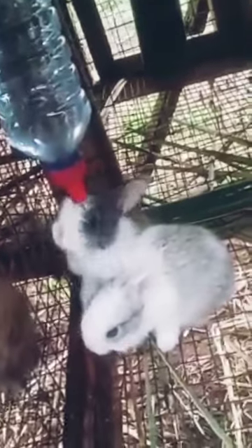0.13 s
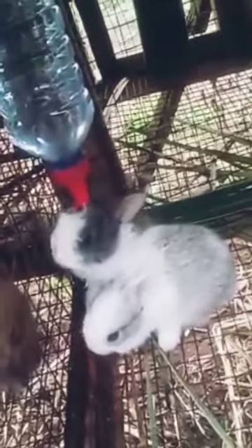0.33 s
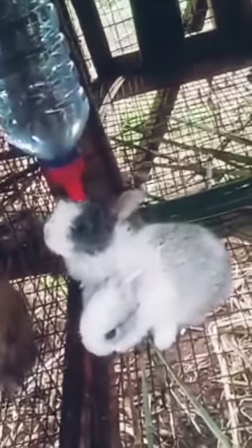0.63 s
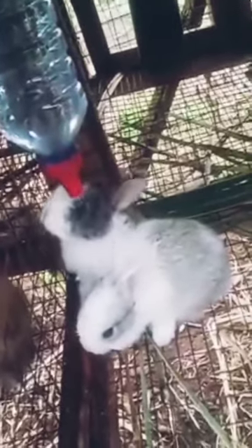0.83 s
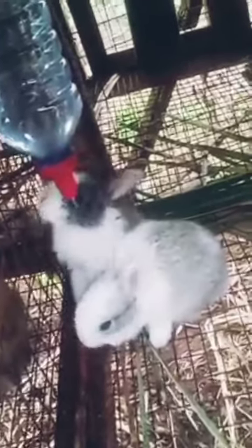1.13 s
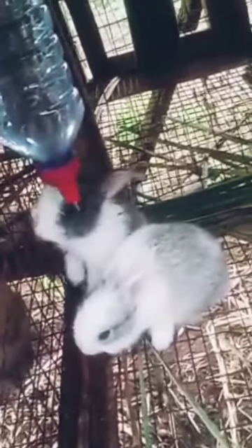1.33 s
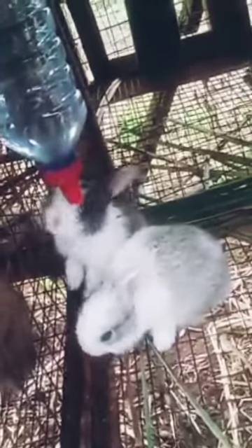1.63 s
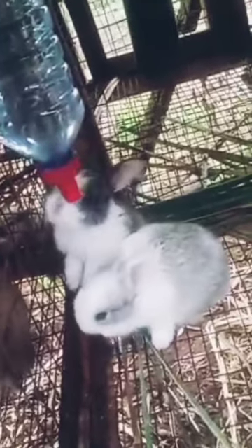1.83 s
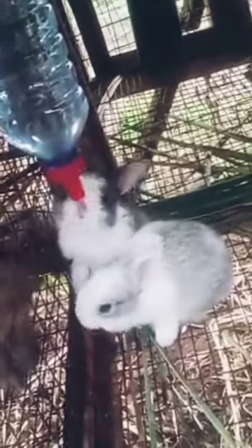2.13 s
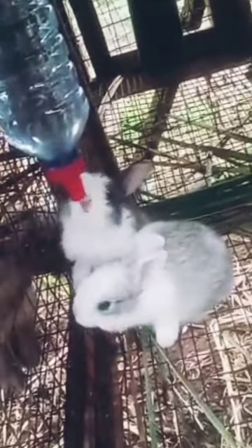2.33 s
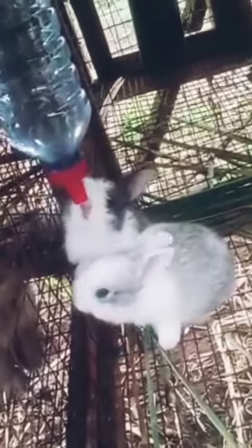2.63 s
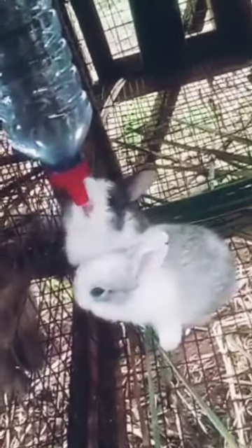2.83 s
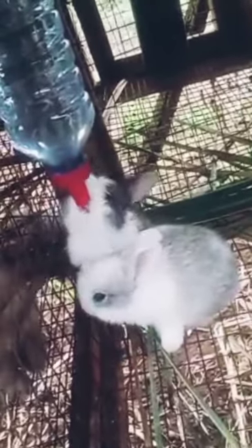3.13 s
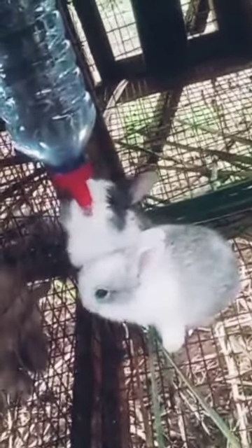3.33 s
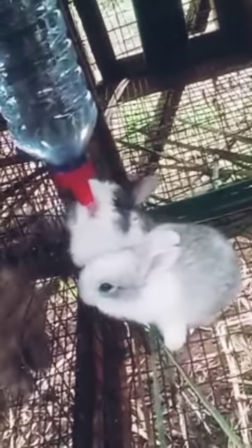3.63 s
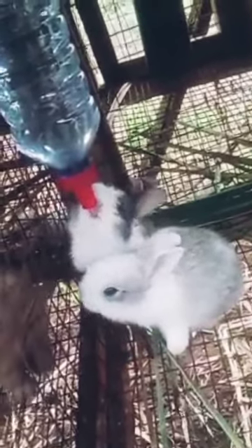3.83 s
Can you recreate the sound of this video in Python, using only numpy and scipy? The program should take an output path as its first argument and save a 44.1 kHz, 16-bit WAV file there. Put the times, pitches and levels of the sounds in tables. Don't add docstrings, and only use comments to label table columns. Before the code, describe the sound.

Close up in an outdoor hutch, a drinking-bottle ball rattles sharply in its metal tube under steady licking, with lip pops, tiny bubbles and a few faint wooden taps over very quiet air and low hum.

```python
import sys
import numpy as np
from scipy import signal
from scipy.fft import rfft, irfft
from scipy.io import wavfile
from scipy.ndimage import uniform_filter1d

SR = 44100
rng = np.random.default_rng(int(sys.argv[2]) if len(sys.argv) > 2 else 0)


def output_pcm(signal):
    pcm = np.clip(np.atleast_2d(signal).T, -1, 1) * 32767
    wavfile.write(sys.argv[1], SR, np.round(pcm).astype(np.int16))


def linear_from_db(decibels):
    return 10 ** (np.asarray(decibels, float) / 20)


N = 176400
CLOCK = np.arange(N) / SR


def ring(x, hz, t60):
    pole = np.exp(2j * np.pi * hz / SR - np.log(1000) / (t60 * SR))
    return signal.lfilter([1], [1, -pole], x).imag


def fade(x, t60):
    return signal.lfilter([1], [1, -np.exp(-np.log(1000) / (t60 * SR))], x)


def highpass(x, order, hz):
    return signal.sosfilt(signal.butter(order, hz, "high", fs=SR, output="sos"), x)


def strikes(times, sizes):
    return np.bincount(np.clip((times * SR).astype(int), 0, N - 1), sizes, N)


def unit(x):
    return x / np.sqrt(np.mean(x ** 2))


def walk(rate):
    k = int(SR / rate)
    return unit(uniform_filter1d(uniform_filter1d(rng.standard_normal(N), k), k))


# (frequency [Hz], level [dB per Hz])
YARD_SPECTRUM = [
    (40, -1),
    (105, -7),
    (213, -13.5),
    (680, -18.5),
    (1170, -15),
    (4200, -32),
    (8600, -37),
    (11000, -39),
]


def yard():
    yard_db, flicker_db = -63.5, 3.2
    f = np.maximum(np.fft.rfftfreq(N, 1 / SR), 1)
    hz, db = np.array(YARD_SPECTRUM).T
    shape = linear_from_db(np.interp(np.log(f), np.log(hz), db))
    air = 0
    for octave in np.arange(5, 14.5, .5):
        band = np.maximum(1 - np.abs(np.log2(f) - octave) * 2, 0) ** .5
        noise = irfft(rfft(rng.standard_normal(N)) * shape * band, N)
        air = air + noise * linear_from_db(flicker_db * walk(28))
    return linear_from_db(yard_db) * unit(air)


# (frequency [Hz], level [dB rms])
HUM_TONES = [
    (59.2, -61.5),
    (118.4, -70.5),
    (673, -77),
]


def hum():
    out = 0
    for hz, db in HUM_TONES:
        level = np.sqrt(2) * linear_from_db(db + 1.3 * walk(26.0))
        out = out + level * np.sin(2 * np.pi * hz * (CLOCK + 0.12 / hz * walk(5.9)))
    return out


# (time [s], level [dB], pitch [Hz])
HUTCH_TAPS = [
    (0.333, -54, 330),
    (1.337, -49, 365),
    (3.5105, -44, 1880),
    (3.5175, -40.5, 1880),
    (3.523, -38, 1630),
    (3.608, -52, 274),
]


def taps():
    cycles = 4.8
    out = 0
    for t, db, hz in HUTCH_TAPS:
        rap = fade(strikes(np.array([t]), linear_from_db([db - 14.0])), 20 / hz) * rng.standard_normal(N)
        out = out + ring(rap, hz, cycles / hz) + .5 * ring(rap, 0.75 * hz, cycles / hz / 3)
    return out


# (time [s], peak level [dB], start pitch [Hz])
RISING_BUBBLES = [
    (0.058, -56.5, 1440),
    (0.667, -49, 1270),
    (1.107, -56, 1440),
    (1.127, -48, 1477),
    (1.624, -52, 1470),
    (1.639, -64, 1540),
    (3.508, -51, 1320),
]


def bubbles():
    rise_per_s, peak_s = 3.4, 0.0063
    out, u = np.zeros(N), np.arange(int(8 * peak_s * SR)) / SR
    envelope = np.exp(1 - u / peak_s) * u / peak_s
    for t, db, hz in RISING_BUBBLES:
        tone = np.sin(2 * np.pi * hz * (u + rise_per_s * u ** 2 / 2)) * envelope
        out[int(t * SR):int(t * SR) + len(u)] += linear_from_db(db) * tone
    return out


# (time [s], peak level [dB])
TONGUE_SMACKS = [(0.042, -41.5), (0.2403, -45), (0.662, -44), (0.8477, -38), (1.0718, -39.5), (1.266, -41),
                 (1.478, -42.5), (1.6947, -42.5), (1.9102, -43.5), (2.4667, -44.5), (2.097, -39),
                 (2.8716, -44), (3.0987, -51), (3.2985, -49), (3.305, -55), (3.5338, -44.5), (3.5386, -45),
                 (3.7581, -47.5), (3.7625, -48), (3.9805, -48.5), (3.984, -48.5)]
# (time [s], peak level [dB])
LIP_POPS = [(0.096, -33), (0.3, -51), (0.743, -38), (0.9513, -34), (0.956, -36), (1.1222, -36.5),
            (2.566, -45), (3.1441, -29), (3.2, -47), (3.333, -36), (3.6613, -33.5), (3.8328, -29)]


def tongues():
    smack_hz, pop_hz, level_db, snap_db, peak_s = 2200, 2830, -6, 14, .0005
    out, u = np.zeros(N + 400), np.arange(400) / SR
    events = [(t, db, smack_hz, 1) for t, db in TONGUE_SMACKS]
    events += [(t, db, pop_hz, .1) for t, db in LIP_POPS]
    for t, db, hz, bright in events:
        pitch, top = rng.standard_normal(2)
        body = np.sin(2 * np.pi * hz * 2 ** (.25 * pitch) * u) * np.exp(1 - u / peak_s) * u / peak_s
        snap = bright * linear_from_db(snap_db + top) * rng.standard_normal(400) * np.exp(-u / 0.00048)
        out[int(t * SR):int(t * SR) + 400] += linear_from_db(db + level_db) * (body + snap)
    return highpass(out[:N], 2, 800)


# (peak time [s], level [dB])
WATER_SWELLS = [(0.127, -50), (0.345, -57), (0.607, -49.5), (0.725, -49), (0.806, -49.5), (0.928, -42.5),
                (1.002, -49), (1.097, -51.5), (1.141, -45.5), (1.376, -48), (1.441, -52.5), (1.508, -62),
                (1.583, -47.5), (1.634, -51), (1.783, -47.5), (1.963, -48), (2.152, -48.5), (2.34, -47.5),
                (2.549, -45.5), (2.76, -40.5), (2.907, -53), (2.961, -42.5), (3.37, -45.5), (3.646, -45.5),
                (3.793, -56), (3.873, -53.5)]


def swell():
    width_s = 0.018
    return sum(linear_from_db(db) * np.exp(-((CLOCK - s) / width_s) ** 2) for s, db in WATER_SWELLS)


# (frequency [Hz], level [dB], t60 [s])
BOTTLE_MODES = [
    (1145, 10, 0.046),
    (933.6, -3.5, 0.094),
    (1500, -9.5, 0.076),
    (561, -0.5, 0.034),
    (284, -16.5, 0.019),
]


def air_column(hits):
    flow = swell()
    breath = linear_from_db(-35.5) * flow + linear_from_db(-60.5) * fade(hits, 0.018)
    phase = np.cumsum(BOTTLE_MODES[0][0] * (1 + 0.0145 * walk(28.5))) / SR
    out = linear_from_db(-8.0) * flow * np.sin(2 * np.pi * phase)
    for hz, db, t60 in BOTTLE_MODES:
        out = out + linear_from_db(db) * ring(breath * rng.standard_normal(N), hz, t60)
    return out


# (peak time [s], level [dB])
BALL_SCRAPES = [(0.19, -56), (0.317, -44), (.39, -52), (0.532, -40), (.594, -61), (.719, -57), (.795, -43),
                (0.929, -38.5), (0.993, -45), (1.127, -38.5), (1.193, -60), (1.338, -51), (1.376, -49),
                (1.43, -68), (1.57, -63), (1.635, -67), (1.71, -50), (1.764, -46), (1.92, -42.5),
                (1.956, -35.5), (2.105, -44), (2.125, -41), (2.149, -56), (2.278, -49.5), (2.335, -36),
                (2.531, -56), (2.542, -39), (2.739, -32), (2.937, -38), (2.955, -38.5), (2.968, -43),
                (3.015, -65), (3.117, -50.5), (3.164, -41.5), (3.318, -58), (3.365, -41), (3.378, -39),
                (3.401, -46), (3.573, -53), (3.621, -37.5), (3.649, -47), (3.827, -46), (3.854, -57),
                (3.869, -74), (3.998, -49)]


def scrapes():
    rise_s, fall_s = 0.0089, 0.012
    power = 0
    for s, db in BALL_SCRAPES:
        width = np.where(CLOCK < s, rise_s, fall_s)
        power = power + linear_from_db(2 * db) * np.exp(-2 * ((CLOCK - s) / width) ** 2)
    return power ** .5


def bounces(drag):
    ticks_per_s, strays_per_s = 340, 35
    when, size = rng.random(N), rng.exponential(size=N)
    ticks = (when < ticks_per_s / SR) * linear_from_db(9.5 - 1.5 * size) * drag
    return ticks + (1 - when < strays_per_s / SR) * linear_from_db(-57 + 2 * size)


def grit_level(t, db, hits, drag):
    grit = linear_from_db(-14.5 + 1.7 * walk(220)) * drag
    grit = grit + linear_from_db(-33.5) * fade(hits, 0.025) + linear_from_db(-54) * fade(hits, .24)
    rested = np.diff(t, prepend=0) > .03
    first = strikes(t, linear_from_db(db) * rested)
    return grit + linear_from_db(-32.5) * fade(first[::-1], 0.025)[::-1]


# (frequency [Hz], level [dB])
TUBE_MODES = [(5850, -37), (6650, -11.5), (7400, -11), (8100, -11), (8650, -1), (9300, -8), (9900, -14.5),
              (11400, -13), (12300, -14.5), (13700, -14), (14700, -24)]


def tube(t, knock_db, ticks, grit):
    ring_cycles = 42
    weight = linear_from_db(np.array(TUBE_MODES)[:, 1])
    mix = linear_from_db(2.5 * rng.standard_normal((len(t), len(TUBE_MODES))))
    mix = mix * np.sqrt(np.sum(weight ** 2) / np.sum((mix * weight) ** 2, axis=1, keepdims=True))
    late = 0.00025 * rng.random(mix.shape)
    out = 0
    for k, (hz, mode_db) in enumerate(TUBE_MODES):
        knocks = strikes(t + late[:, k], (-1) ** k * linear_from_db(knock_db) * mix[:, k])
        rough = grit * linear_from_db(-18 * (hz > 10000) + 3 * walk(110))
        push = knocks + (ticks + rough) * rng.standard_normal(N)
        out = out + linear_from_db(mode_db) * ring(push, hz, ring_cycles / min(hz, 9000))
    return highpass(out, 2, 5000)


# (frequency [Hz], level [dB])
CAVITIES = [
    (1900, -27.5),
    (2800, -24),
    (4200, -22.5),
]


def wet_cavities(t, db, ticks, grit):
    out = 0
    for hz, mode_db in CAVITIES:
        scatter = 4 * np.tanh(rng.standard_normal(len(t)))
        splash = fade(strikes(t, linear_from_db(.5 * db - 35.5 + scatter)), 0.0089)
        push = (splash + ticks + 3 * grit * linear_from_db(3 * walk(85))) * rng.standard_normal(N)
        out = out + linear_from_db(mode_db) * ring(push, hz, 0.0034)
    return out


# (time [s], peak level [dB])
BALL_KNOCKS = [(0.0208, -23), (0.0615, -15), (0.0794, -33), (0.0836, -30), (0.1162, -23), (0.12, -21),
               (0.122, -14), (0.1238, -24), (0.1357, -26), (0.1786, -35), (0.1818, -26), (0.1857, -29),
               (0.2604, -14), (0.2671, -27), (0.2834, -15), (0.2851, -26), (0.3032, -32), (0.3253, -29),
               (0.3354, -15), (0.3373, -14), (0.3849, -31), (0.3938, -35), (0.4037, -33), (0.4184, -25),
               (0.4679, -15), (0.4729, -29), (0.4926, -16), (0.4951, -32), (0.5134, -25), (0.5193, -20),
               (0.5216, -13), (0.5461, -37), (0.5858, -35), (0.5874, -32), (0.5918, -26), (0.5937, -26),
               (0.5967, -28), (0.67, -16), (0.6972, -16), (0.6995, -27), (0.7097, -24), (0.7144, -24),
               (0.7169, -15), (0.7188, -19), (0.7271, -26), (0.7359, -33), (0.7434, -35), (0.7848, -29),
               (0.7898, -28), (0.8022, -24), (0.8813, -16),
               (0.8872, -29), (0.9082, -22), (0.9206, -19), (0.9286, -22), (0.9324, -23), (0.952, -35),
               (0.957, -37), (0.9611, -21), (0.9798, -30), (0.9966, -31), (1.0008, -27), (1.0132, -31),
               (1.021, -32), (1.0698, -25), (1.0893, -19), (1.1097, -25), (1.1284, -21), (1.1348, -11),
               (1.1482, -25), (1.1543, -27), (1.188, -34), (1.1939, -32), (1.1957, -21), (1.2902, -14),
               (1.2975, -28), (1.3095, -12), (1.3126, -25), (1.3337, -27), (1.346, -16), (1.3498, -20),
               (1.3532, -26), (1.3655, -21), (1.3671, -21), (1.3698, -18), (1.4124, -32), (1.4181, -28),
               (1.4297, -31), (1.4354, -25), (1.4807, -37), (1.5024, -14), (1.5044, -26), (1.5079, -28),
               (1.522, -13), (1.5243, -23), (1.5478, -34), (1.5519, -15), (1.5539, -26), (1.5563, -24),
               (1.5582, -25), (1.5729, -28), (1.5767, -24),
               (1.5803, -19), (1.5828, -24), (1.5849, -26), (1.6247, -31), (1.6307, -30), (1.6428, -31),
               (1.6474, -22), (1.7192, -17), (1.7395, -18), (1.7415, -31), (1.7685, -25), (1.775, -15),
               (1.7769, -12), (1.7799, -25), (1.7885, -20), (1.8211, -36), (1.8272, -31), (1.9103, -33),
               (1.9323, -25), (1.95, -30), (1.954, -19), (1.9577, -19), (1.963, -16), (2.135, -28),
               (2.1381, -21), (2.1462, -28), (2.155, -33), (2.2866, -17), (2.3164, -25), (2.3219, -19),
               (2.3283, -22), (2.3361, -22), (2.343, -23), (2.4868, -13), (2.4929, -27), (2.5128, -27),
               (2.5198, -16), (2.5225, -20), (2.5258, -25), (2.5293, -25), (2.5322, -19), (2.5389, -22),
               (2.5407, -16), (2.5901, -28), (2.6898, -14), (2.6971, -24), (2.7136, -37), (2.7224, -16),
               (2.7249, -24), (2.7278, -22), (2.7312, -17),
               (2.7436, -24), (2.7543, -16), (2.7722, -22), (2.8083, -19), (2.9002, -15), (2.9201, -21),
               (2.9468, -19), (2.9549, -17), (2.9706, -28), (3.0115, -31), (3.1282, -20), (3.1457, -25),
               (3.1613, -13), (3.1636, -18), (3.1696, -25), (3.1749, -28), (3.2222, -38), (3.3267, -16),
               (3.3294, -28), (3.3316, -29), (3.3514, -24), (3.3557, -30), (3.3618, -21), (3.3644, -26),
               (3.3811, -27), (3.581, -21), (3.5981, -25), (3.6051, -28), (3.6118, -26), (3.631, -28),
               (3.6386, -27), (3.6414, -21), (3.6547, -27), (3.6574, -32), (3.7863, -13), (3.7883, -25),
               (3.7928, -29), (3.8038, -31), (3.8086, -21), (3.8122, -32), (3.8333, -26), (3.8369, -15),
               (3.8395, -22), (3.8417, -15), (3.8465, -23), (3.864, -17), (3.8656, -19), (3.8689, -20),
               (3.8715, -22), (3.8746, -20), (3.9043, -32)]


def nozzle():
    t, db = np.array(BALL_KNOCKS).T
    knock_db = db + 0.32
    hits = strikes(t, linear_from_db(knock_db))
    drag = scrapes()
    ticks = bounces(drag)
    grit = grit_level(t, db, hits, drag)
    rattle = tube(t, knock_db, ticks, grit) + wet_cavities(t, db, ticks, grit)
    return highpass(rattle, 2, 1300) + air_column(hits)


def scene():
    return (yard() + hum() + taps() + bubbles() + tongues() + nozzle())[None]


def roll_off(x):
    return signal.sosfilt(signal.butter(12, 16810, fs=SR, output="sos"), x)


def record(dry):
    x = highpass(dry, 7, 37)
    x = signal.sosfilt(signal.ellip(5, .3, 16, 15600, fs=SR, output="sos"), x)
    return roll_off(x)


dry = scene()
out = record(dry)
output_pcm(out)
```